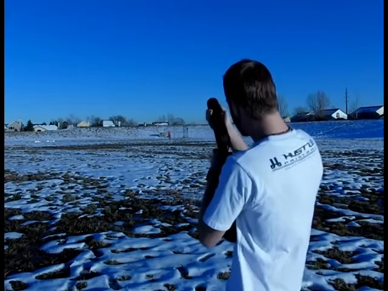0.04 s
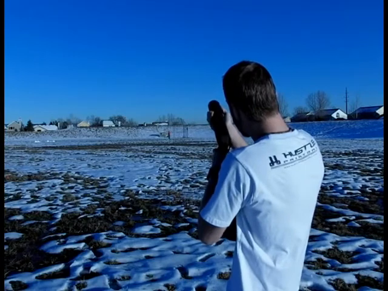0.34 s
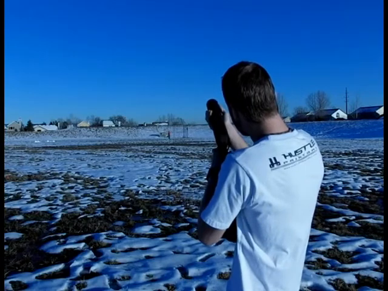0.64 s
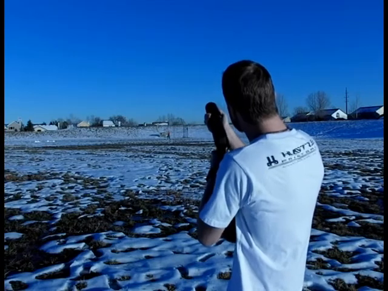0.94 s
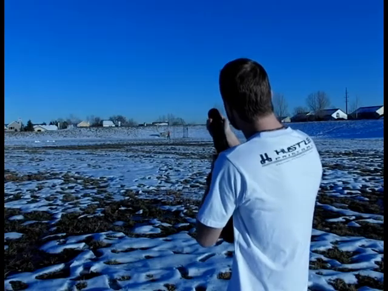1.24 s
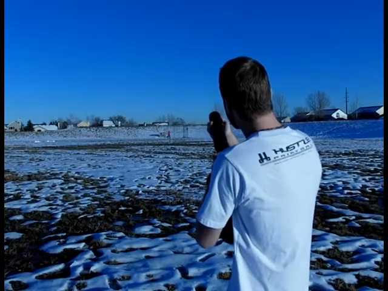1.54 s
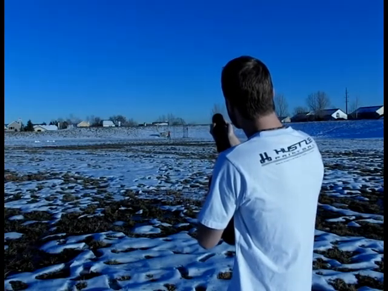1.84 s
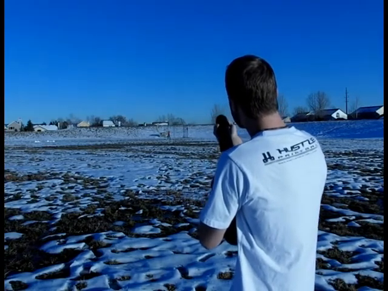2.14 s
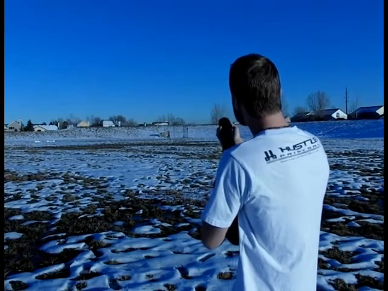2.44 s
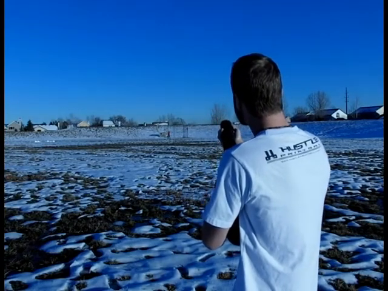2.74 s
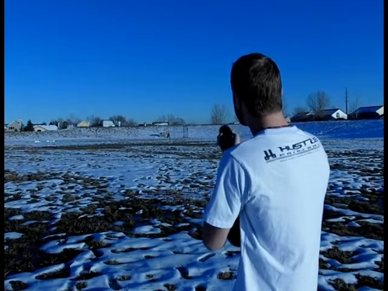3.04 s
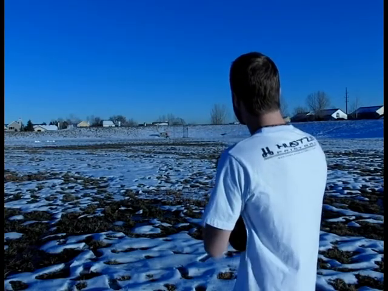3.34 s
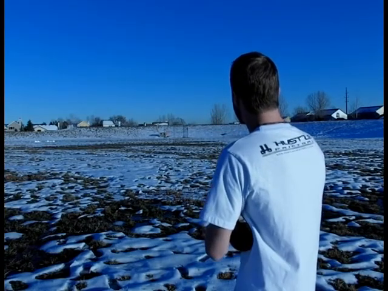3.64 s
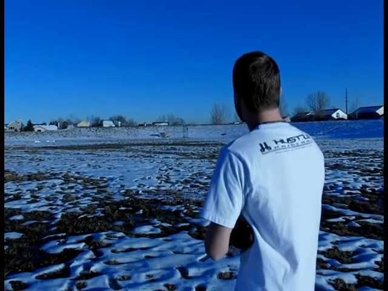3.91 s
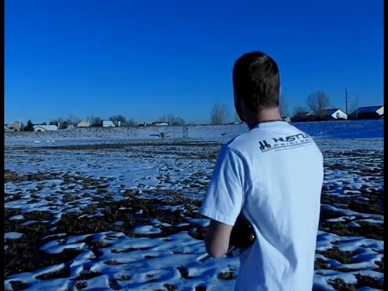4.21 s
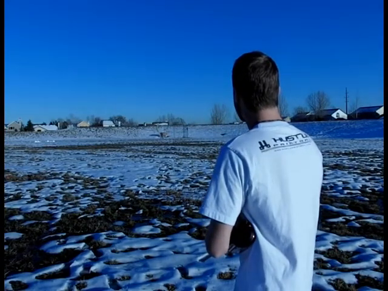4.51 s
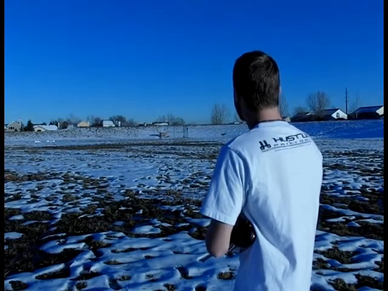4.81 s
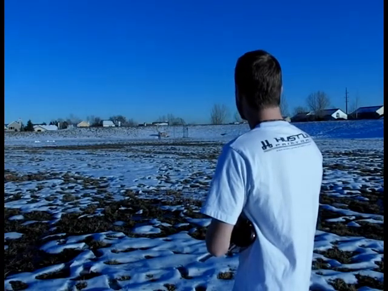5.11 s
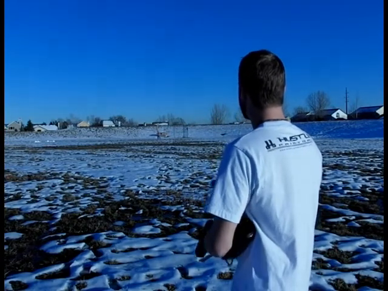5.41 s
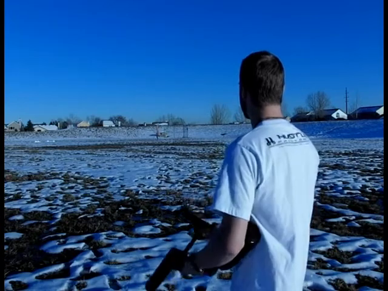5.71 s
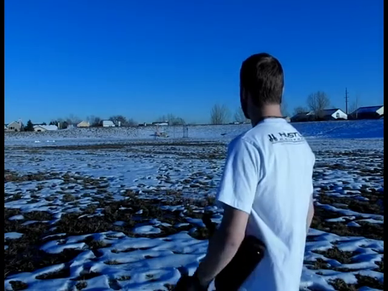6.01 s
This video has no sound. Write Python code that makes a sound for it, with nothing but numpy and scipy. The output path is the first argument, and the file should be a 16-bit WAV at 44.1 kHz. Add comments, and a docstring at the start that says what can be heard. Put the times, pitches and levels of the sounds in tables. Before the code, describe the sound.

Close to the microphone in an open snowy field, a compressed air gun fires once with a sharp, loud pop and a short hollow barrel ring. Gas hisses back in, the action clicks shut, and a valve buzzes briefly, leaving a faint metallic ring. A dull, weak echo returns from far houses. Afterwards there is only a steady low rumble, with a slight sleeve rustle and barely audible distant calls.

```python
"""A snowy field, a step from a camera: a compressed air launcher fires once. The trigger clicks, pressure
fronts and a turbulent jet leave the muzzle, and the barrel's air column rings. Gas hisses back in, the
action closes, and the refill valve chatters and sets the tank ringing; far houses echo the blast.
The camera ducks its gain at the blast. Behind lie a sleeve rustle, faint far calls and a low rumble."""
import sys
import numpy as np
from scipy import signal
from scipy.fft import rfft, irfft, next_fast_len
from scipy.io import wavfile
from scipy.ndimage import map_coordinates

SR = 44100
rng = np.random.default_rng(int(sys.argv[2]) if len(sys.argv) > 2 else 0)


def master(y):
    """Save y as 16-bit WAV."""
    cut = np.clip(np.atleast_2d(y).T, -1, 1)
    pcm = np.round(cut * 32767)  # scale
    wavfile.write(sys.argv[1], SR, pcm.astype(np.int16))


N = 271876

# pressure fronts: t/s, level/dB, time constant/s
PRESSURE_FRONTS = [(0.7229, 10.5, .00045), (0.7239, 20.5, 0.0012)]
# muzzle resonances: f/Hz, relative level/dB, t60/s
MUZZLE_MODES = [(500, -1, .055), (697.8, -6.5, 0.022), (1099.4, 2.5, .03), (1910, -3, 0.033),
                (2260, -4, .025)]
# spectra of the jet and of gas in a narrow throat: f/Hz, relative level/dB
JET_SPECTRUM = [(100, -5.5), (500, 1), (880, -8), (1200, 3), (1600, -8.5), (2300, 2.5), (2850, -15.5),
                (3400, -2), (5200, -3.5), (8000, -12), (11000, 1), (14000, -10), (16000, -25.5)]
HISS_SPECTRUM = [(300, -15.5), (950, -17), (1700, -5.5), (2400, -11), (2850, -11.5), (3600, 0),
                 (4900, -13.5), (8000, -21.5), (9500, -4), (11200, 4.5), (13000, -6), (14200, -11.5),
                 (15000, -35)]


def blast():
    """Pressure fronts leave the muzzle, then the turbulent jet roars and trails off."""
    fronts = 0
    for start_s, db, tau_s in PRESSURE_FRONTS:
        age = since(start_s) / tau_s
        outflow = (1 - np.exp(-6 * age)) * age * np.exp(-age)
        fronts -= amp(db) * np.gradient(outflow) * tau_s * SR  # pressure follows the change of flow
    muzzle = amp(-2.5) * ring(MUZZLE_MODES, .7238)
    roar = (amp(7) * burst(.7255, t60_s=.012, attack_s=.0012)
            + amp(-2.5) * burst(.7228, t60_s=.055)
            + amp(-19.5) * burst(.728, t60_s=.22))
    shriek = amp(2.5) * np.exp(-((clock() - .7266) / .0016) ** 2)  # narrow throat at peak flow
    return fronts - muzzle + roar * noise(JET_SPECTRUM) + shriek * noise(HISS_SPECTRUM)


# barrel air column: t/s, level/dB, first f/Hz, last f/Hz, t60/s
BARREL_RINGS = [(0.7244, -4, 195.6, 228, 0.1), (0.7256, -14.5, 205.2, 242, 0.59),
                (1.077, -27.5, 328, 345, 0.47)]


def barrel(glide_s=.1):
    """The tube rings at the shot and as the action closes, sharpening as the cold gas leaves."""
    out = 0
    for start_s, db, first_hz, last_hz, t60_s in BARREL_RINGS:
        pitch_hz = last_hz + (first_hz - last_hz) * np.exp(-since(start_s) / glide_s)
        phase = 2 * np.pi * np.cumsum(pitch_hz * (clock() > start_s)) / SR
        out += amp(db) * burst(start_s, t60_s, attack_s=.00077) * np.sin(phase)
    return out


# valve resonances: f/Hz, relative level/dB, t60/s
VALVE_MODES = [(463, -1.5, 0.037), (680, -7, 0.024), (1260, -5.5, 0.031), (2377, 0, 0.065),
               (3300, 0, 0.0073), (4050, -9, 0.04), (4200, -8, 0.046), (4340, -5.5, 0.085),
               (4670, -11, .035)]
# spectrum of slaps and puffs: f/Hz, relative level/dB
SPUTTER_SPECTRUM = [(200, -4), (1000, -2.5), (1900, -7), (2400, 5), (2850, -29), (3300, 2.5), (4400, -6),
                    (6000, -9), (8000, -23.5), (9500, -25), (11700, 0), (13400, -17), (14500, -39)]
# final seating beat: t/s, relative level/dB
SEATING_BEAT = (1.329, -0.39)
CHATTER_START_S, BEAT_COUNT = 1.0858, 16


def valve(soft_start_db=-7.5, swell_beats=5.8):
    """The valve slaps its seat in a hardening train; each beat lets a puff through and rebounds."""
    beats = np.zeros(N)
    beat_db = soft_start_db * np.exp(-np.arange(BEAT_COUNT) / swell_beats)
    beats[np.round(beat_times() * SR).astype(int)] = amp(beat_db)
    seat_s, seat_db = SEATING_BEAT
    beats[round(seat_s * SR)] = amp(seat_db)
    each_beat = lambda shape: signal.fftconvolve(beats, shape)[:N]
    rebound = amp(-9.5) * burst(.0066, t60_s=.019, attack_s=.00062)
    slap = burst(0, t60_s=.011, attack_s=.0004) + rebound
    casing = each_beat(slap * noise(SPUTTER_SPECTRUM))  # same answer to every slap: a pitched buzz
    puffs = each_beat(slap) * noise(SPUTTER_SPECTRUM)
    return amp(-37.5) * each_beat(ring(VALVE_MODES, 0)) + amp(-29) * casing + amp(-32.5) * puffs


def beat_times(first_gap_s=.0115, settled_gap_s=.0141, settle_beats=4):
    """The valve's chatter slows towards a steady pace."""
    unsettled = np.exp(-np.arange(BEAT_COUNT - 1) / settle_beats)
    gaps_s = settled_gap_s + (first_gap_s - settled_gap_s) * unsettled
    return CHATTER_START_S + np.append(0, np.cumsum(gaps_s))


def refill(open_s=.873, shut_s=1.021, leak_start_s=1.075):
    """Gas surges and hisses through a narrow port into the chamber, then leaks past the valve."""
    surge_db = 7.5 * np.exp(-since(open_s) / .039)
    flow = amp(-30.5 + surge_db) * held(open_s, shut_s, t60_s=.18, attack_s=.0018)
    leak = amp(-48.5) * held(leak_start_s, beat_times()[-1], t60_s=.48, attack_s=.0014)
    return (flow + leak) * amp(.77 * wobble(90)) * noise(HISS_SPECTRUM)


# tank resonances: f/Hz, level/dB, t60/s
TANK_MODES = [(907, -42, 1.07), (2370, -57, 0.46), (3430, -57.5, 1), (4530, -66, 0.48)]


def tank(rise_s=.0091):
    """The tank rings with the valve's chatter and lingers, the higher modes more blurred."""
    swell = 1 - np.exp(-since(CHATTER_START_S) / rise_s)
    after_s = since(beat_times()[-1])
    out = 0
    for hz, db, t60_s in TANK_MODES:
        blur_rad = hz / 2600 * wobble(hz / 20)
        level_db = db + wobble(25.55) - 60 * after_s / t60_s
        out += amp(level_db) * np.sin(2 * np.pi * hz * clock() + blur_rad)
    return swell * out


# clicks and knocks: t/s, level before filtering/dB, centre f/Hz
LAUNCHER_KNOCKS = [(0.7001, -32.5, 1550), (1.076, -30, 810), (1.394, -44, 1830), (1.409, -38.5, 1824),
                   (1.452, -36, 2290), (1.467, -28.5, 930), (1.775, -45.5, 1858), (3.324, -42, 1069),
                   (3.3947, -42, 1470), (4.642, -32, 245)]


def knocks(width_hz=1150, widest_octaves=1.9, edge_hz=2500, contact_cycles=7):
    """Mechanism and handling: each hard touch excites a dull, quickly damped body."""
    out = 0
    for start_s, db, centre_hz in LAUNCHER_KNOCKS:
        octaves = min(width_hz / centre_hz, widest_octaves)

        def body(hz):
            band = 2 ** -((np.log2((hz + 1) / centre_hz) / octaves) ** 2)
            return band * rolloff(hz, edge_hz, order=5)

        grain = burst(start_s, t60_s=.022) * unit(filtered(rng.standard_normal(N), body))
        contact = ring([(centre_hz, -.5, contact_cycles / centre_hz)], start_s)
        out += amp(db) * filtered(contact + grain, body)
    return out


# rubbing cloth: f/Hz, relative level/dB
CLOTH_SPECTRUM = [(200, -12.5), (700, 1), (2100, 0.5), (2900, -28.5), (11000, -18.5), (13000, -37.5)]


def sleeve(grip_s=3.322, slip_s=3.48):
    """Cloth grips with a tick, rubs on more lightly and slips free with another."""
    grip_db = 3 * np.exp(-since(grip_s) / .04)
    rub = amp(-63.5 + grip_db + 1.8 * wobble(70)) * held(grip_s, slip_s, t60_s=.04, attack_s=.004)
    ticks = sum(burst(start_s, t60_s=.003, attack_s=.0001) for start_s in (grip_s, slip_s))
    return rub * noise(CLOTH_SPECTRUM) + amp(-51) * ticks * rng.standard_normal(N)


# returns from the houses: t/s, level/dB, t60/s
HOUSE_ECHOES = [(1.33, -51.5, 2.08), (1.957, -46.5, 0.086)]
# their spectrum: f/Hz, relative level/dB
ECHO_SPECTRUM = [(150, -16), (450, 10), (900, 2), (1500, 1), (2300, -4), (3000, -32), (6000, -36)]


def echoes():
    """The blast returns from far houses as noise, dulled by the way back."""
    returns = sum(amp(db) * burst(start_s, t60_s, attack_s=.0038) for start_s, db, t60_s in HOUSE_ECHOES)
    return returns * noise(ECHO_SPECTRUM)


# calls: t/s, length/s, f/Hz, level/dB
FAR_CALLS = [(3.799, .13, 2342, -78.5), (5.03, 0.18, 565.6, -56), (5.27, 0.17, 2353, -68.5)]


def far_calls():
    """Thin, wavering tones from across the field."""
    out = 0
    for start_s, length_s, hz, db in FAR_CALLS:
        swell = np.sin(np.pi * np.clip(since(start_s) / length_s, 0, 1))
        out += amp(db + 5.2 * wobble(50)) * swell * np.sin(2 * np.pi * hz * clock() + wobble(80))
    return out


# spectra of the rumble and the faint hiss: f/Hz, relative level/dB
RUMBLE_SPECTRUM = [(12, -38.5), (20, -9), (48, -3), (102, -4), (135, -13.5), (204, -16), (320, -23.5),
                   (353, -24.5), (839, -26.5), (1130, -31.5), (1400, -31), (2200, -40), (2860, -74.5),
                   (4840, -120)]
FLOOR_SPECTRUM = [(2000, -4.5), (3000, -6.5), (4800, -2), (5600, 0), (11800, 0), (12800, -15), (16000, -21)]


def outdoors():
    """A far, steady rumble under a very faint hiss."""
    rumble = amp(-44 + .27 * wobble(1.7) + .63 * wobble(10)) * air(RUMBLE_SPECTRUM, edge_hz=2250)
    return rumble + amp(-78.5) * air(FLOOR_SPECTRUM, edge_hz=14000)


# outdoor air: f/Hz, left-right correlation
AIR_CORRELATION = [(60, 0.99), (180, 0.85), (550, 0.2), (1650, -0.7), (4970, -0.73), (15000, -0.62)]


def air(spectrum, edge_hz):
    """Stereo noise of rms 1 that falls steeply above an edge."""
    def response(hz):
        angle = np.arccos(np.clip(along(AIR_CORRELATION, hz), -1, 1)) / 2
        shares = np.array([np.cos(angle), np.sin(angle)])
        return amp(along(spectrum, hz)) * rolloff(hz, edge_hz, order=20) * shares

    mid, side = filtered(rng.standard_normal((2, N)), response)
    return unit(np.array([mid + side, mid - side]))


# launcher at the two microphone ports: f/Hz, left minus right level/dB
PORT_BALANCE = [(200, -0.5), (700, -0.5), (1300, -3.5), (2400, -7), (4400, -0.5), (8000, -0.5), (14000, 4)]


def microphone_ports(x, delay_s=.00008, max_lag_rad=2.8, scatter_hz=1200):
    """Sound from the right reaches that port first; the snow scatters a little treble back."""
    sides = np.array([[.5], [-.5]])
    lag_rad = lambda hz: max_lag_rad * np.tanh(2 * np.pi * hz * delay_s / max_lag_rad)
    direct = filtered(x, lambda hz: amp(sides * along(PORT_BALANCE, hz))
                      * np.exp(-1j * sides * lag_rad(hz)))
    tail = rng.standard_normal((2, N)) * burst(.00018, t60_s=.015)
    scatter = signal.fftconvolve(x[None], tail / np.linalg.norm(tail[0]), axes=1)[:, :N]
    return direct + amp(-10.5) * filtered(scatter, lambda hz: hz ** 2 / (hz ** 2 + scatter_hz ** 2))


def amp(db):
    """Decibels to gain."""
    return 10 ** (np.asarray(db) / 20)


def unit(x):
    """Scale to rms 1."""
    return x / np.sqrt(np.mean(x ** 2) + 1e-20)


def along(points, hz):
    """Read (f/Hz, value) points on a log axis."""
    knots_hz, values = np.transpose(points)
    return np.interp(np.log(hz + 1), np.log(knots_hz + 1), values)


def clock():
    """Sample times in seconds."""
    return np.arange(N) / SR


def since(start_s):
    """Seconds since the start, zero before it."""
    return np.maximum(clock() - start_s, 0)


def wobble(knots_per_s):
    """Smooth random curve."""
    return map_coordinates(rng.standard_normal(int(N * knots_per_s / SR) + 4), [clock() * knots_per_s])


def rolloff(hz, edge_hz, order):
    """Low-pass gain."""
    return 1 / np.sqrt(1 + (hz / edge_hz) ** (2 * order))


def filtered(x, response):
    """Apply a frequency response."""
    size = next_fast_len(N + 8192)
    return irfft(rfft(x, size) * response(np.fft.rfftfreq(size, 1 / SR)), size)[..., :N]


def noise(spectrum):
    """Coloured noise of rms 1."""
    return unit(filtered(rng.standard_normal(N), lambda hz: amp(along(spectrum, hz))))


def held(start_s, end_s, t60_s, attack_s):
    """Envelope: rise, hold, decay."""
    rise = 1 - np.exp(-since(start_s) / attack_s)
    return rise * np.exp(-np.minimum(np.log(1000) * since(end_s) / t60_s, 20))


def burst(start_s, t60_s, attack_s=.0027):
    """Envelope: rise, decay."""
    return held(start_s, start_s, t60_s, attack_s)


def ring(modes, start_s):
    """Damped modes, struck once."""
    return sum(amp(db) * burst(start_s, t60_s, attack_s=.0001) * np.sin(2 * np.pi * hz * since(start_s))
               for hz, db, t60_s in modes)


def scene():
    """The launcher close by, the field all around."""
    close = blast() + barrel() + refill() + valve() + tank() + sleeve() + knocks()
    return microphone_ports(close) + echoes() + far_calls() + outdoors()


def record(dry, duck_db=12, hold_s=.3016, release_s=.039, top_hz=15600):
    """An overload turns the camera's gain down for a moment; the peak still clips."""
    overload = np.abs(dry).max(axis=0) > .5
    since_overload_s = clock() - np.maximum.accumulate(np.where(overload, clock(), -10))
    ducked = dry * amp(-duck_db * np.clip(1 - (since_overload_s - hold_s) / release_s, 0, 1))
    clipped = ducked / (1 + ducked ** 6) ** (1 / 6)
    return filtered(clipped, lambda hz: rolloff(hz, top_hz, order=40))


dry = scene()
out = record(dry)
master(out)
```